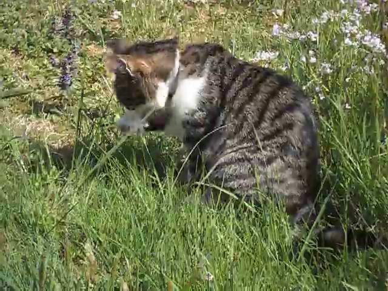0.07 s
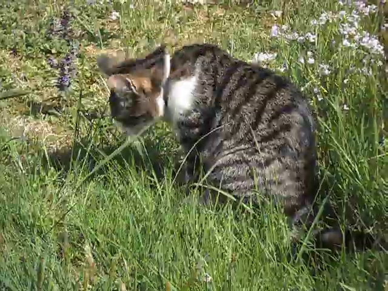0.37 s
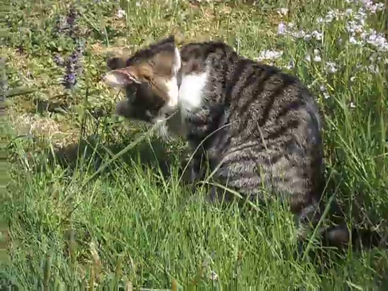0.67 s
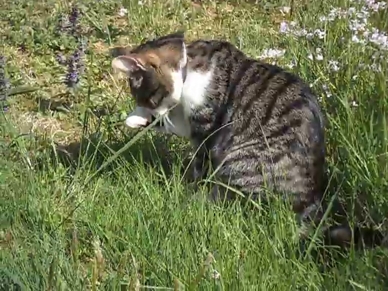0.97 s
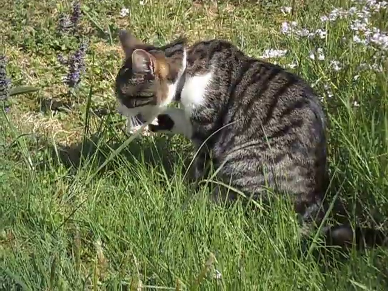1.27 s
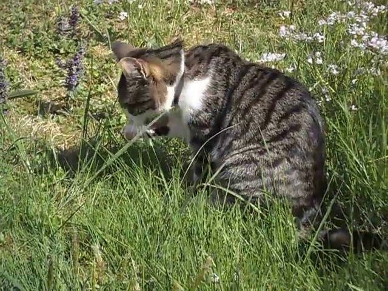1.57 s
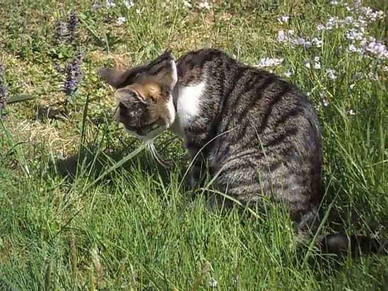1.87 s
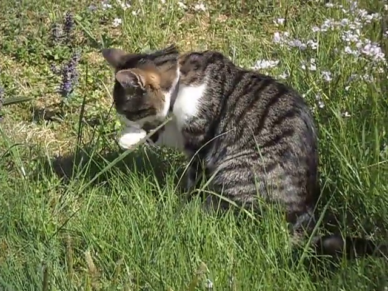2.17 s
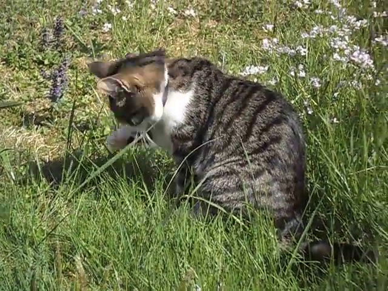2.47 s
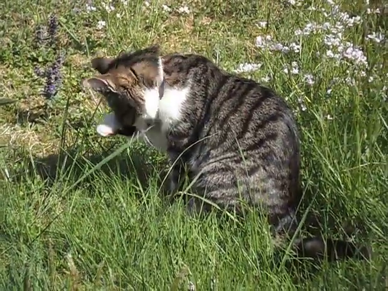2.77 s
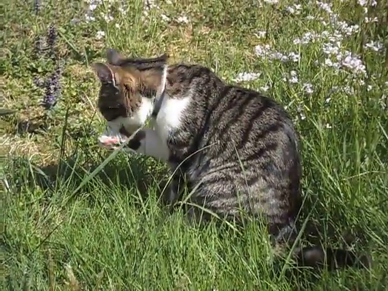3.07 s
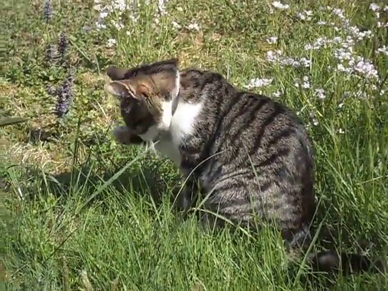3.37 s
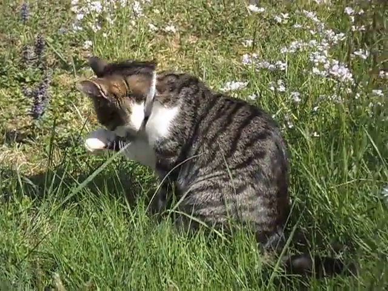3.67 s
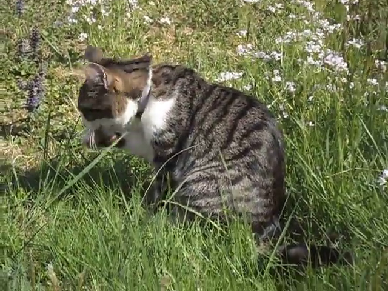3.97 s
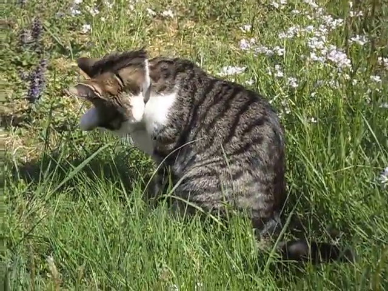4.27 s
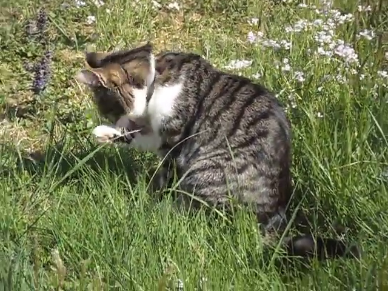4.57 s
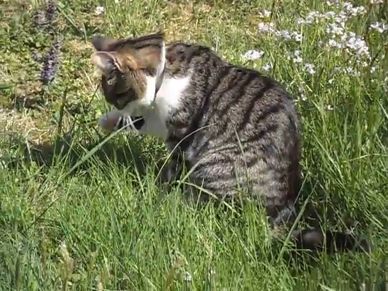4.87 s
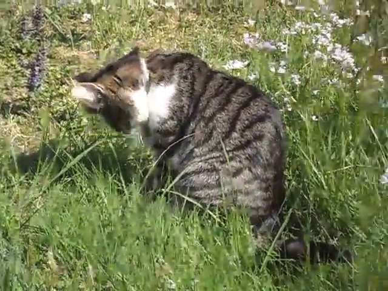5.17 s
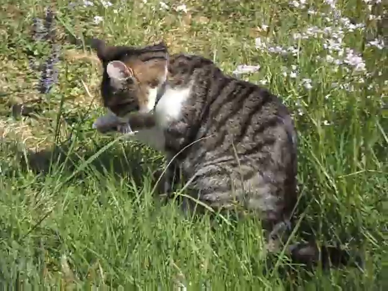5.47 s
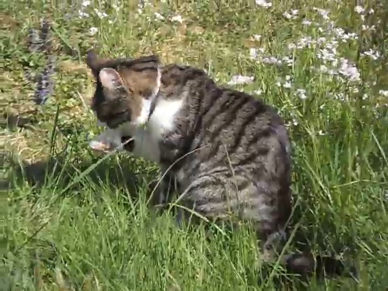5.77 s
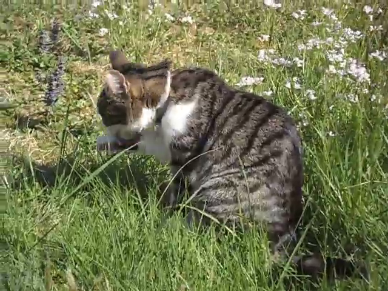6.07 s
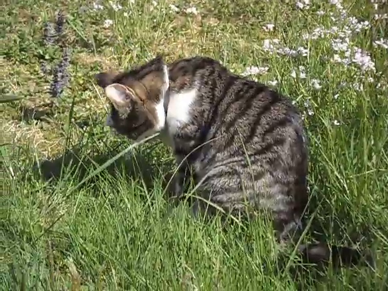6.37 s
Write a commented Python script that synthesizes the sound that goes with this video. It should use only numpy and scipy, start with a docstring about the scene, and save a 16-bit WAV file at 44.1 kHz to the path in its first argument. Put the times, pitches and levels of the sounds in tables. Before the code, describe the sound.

A low pop, then quiet outdoor hiss with soft wind rumble, a faint distant motor and a cat briefly licking its fur.

```python
"""A cat washes its paw with a few soft licks, its barbed tongue rubbing over the fur.
It sits in a quiet meadow before a small camera, whose microphone comes on with a pop
and adds steady hiss and a thin electronic whine. Eddies of a light breeze press on the
diaphragm, a far-off motor hums faintly, and one small tick rings briefly."""
import sys
import numpy as np
from scipy.fft import rfft, irfft, next_fast_len
from scipy.io import wavfile
from scipy.ndimage import map_coordinates

SR = 44100
rng = np.random.default_rng(int(sys.argv[2]) if len(sys.argv) > 2 else 0)


def transcribe(signal):
    """Save signal, clipped to [-1, 1], as a 16-bit WAV file at the path in sys.argv[1]."""
    frames = np.atleast_2d(signal).T
    limited = np.clip(frames, -1, 1)
    pcm = np.round(limited * 32767).astype(np.int16)
    wavfile.write(sys.argv[1], SR, pcm)


N = 287973
SWITCH_ON_S = 0.222


def amp(db):
    """Amplitude ratio of a level in decibels."""
    return 10 ** (np.asarray(db) / 20)


def unit(x):
    """x normalised to rms 1."""
    return x / np.sqrt(np.mean(x ** 2) + 1e-20)


def clock():
    """The time of each sample in seconds."""
    return np.arange(N) / SR


def wobble(rate):
    """Smooth random modulation: a spline through rate knots a second."""
    knots = rng.standard_normal(int(N * rate / SR) + 4)
    return map_coordinates(knots, [clock() * rate])


def coloured(x, points, top_hz=np.inf):
    """Zero-phase filtering by (f/Hz, gain/dB) points on a log axis, cut off at top_hz."""
    size = next_fast_len(N + SR // 2)
    hz = np.fft.rfftfreq(size, 1 / SR)
    f, db = np.transpose(points)
    gain = amp(np.interp(np.log(hz + 1), np.log(f), db)) * (hz < top_hz)
    return irfft(rfft(x, size) * gain, size)[:N]


def noise(points):
    """Gaussian noise of rms 1, filtered to the given spectral shape."""
    return unit(coloured(rng.standard_normal(N), points))


def tone(hz):
    """A sine of rms 1 whose phase is the integral of its frequency."""
    return np.sqrt(2) * np.sin(2 * np.pi * (np.cumsum(hz) / SR + rng.random()))


def bias_pop(step_db=-15.0, overshoot=0.46, charge_s=0.043, leak_s=0.22):
    """Step response: the bias voltage jumps, swells and leaks away through the coupling capacitor."""
    age = np.maximum(clock() - SWITCH_ON_S, 0)
    leak = (1 + overshoot) * np.exp(-age / leak_s)
    charge = overshoot * np.exp(-age / charge_s)
    return amp(step_db) * (leak - charge)


def electronics(hiss_db=-61, waver_hz=3, settle_db=3.0, settle_s=0.067):
    """Self-noise: broadband preamplifier hiss, a little louder at switch-on, and a tonal whine."""
    # hiss spectrum: f/Hz, relative density/dB
    hiss_spectrum = [(20, -8), (200, -1.5), (2000, -1.5), (4000, -2), (8000, -4.5), (10300, -5.5),
                     (11000, -19), (11600, -4.5)]
    # partials of the whine: f/Hz, rms level/dB
    whine_partials = [(3926, -86), (7853, -82), (7882, -89.5)]
    age = np.maximum(clock() - SWITCH_ON_S, 0)
    settling = np.exp(-(age / settle_s) ** 2)
    hiss = amp(hiss_db + settle_db * settling) * noise(hiss_spectrum)
    whine = sum(amp(db) * tone(hz + waver_hz * wobble(15)) for hz, db in whine_partials)
    return hiss + whine


def meadow(air_db=-61.0):
    """Ambient noise: the distant outdoors blends into a dull, stationary wash."""
    # ambient spectrum: f/Hz, relative density/dB
    air_spectrum = [(20, 7.5), (100, 1), (200, -3), (400, -6), (800, -10), (1600, -14.5), (3200, -23.5),
                    (10000, -44)]
    return amp(air_db) * noise(air_spectrum)


def breeze(calm_db=-60, flutter_db=1.6, eddies_per_s=14):
    """Turbulent pressure: eddies rumble on the microphone, and gusts add in power to the calm."""
    # gusts: crest t/s, level/dB, half-width at 1/e of the power/s
    gusts = [(1.13, -52.5, 0.14), (1.88, -52, 0.057), (2.35, -51.5, 0.15), (2.665, -52.5, .11),
             (3.18, -53.5, 0.11), (3.575, -48.5, 0.026), (3.83, -52.5, 0.16), (4.43, -52, 0.13),
             (5.84, -48, 0.11), (6.22, -50, 0.46)]
    # spectrum of the buffeting: f/Hz, relative density/dB
    buffet_spectrum = [(4, 0), (12, 4), (22, 2.5), (35, 2.5), (55, -9), (90, -21.5), (160, -36), (500, -59),
                       (2000, -110)]
    t = clock()
    gust_power = sum(amp(db) ** 2 * np.exp(-((t - s) / half_s) ** 2) for s, db, half_s in gusts)
    envelope = np.sqrt(amp(calm_db) ** 2 + gust_power)
    flutter = amp(flutter_db * wobble(eddies_per_s))
    return envelope * flutter * noise(buffet_spectrum)


def motor(start_hz=80.1, sag_hz_per_s=2.7, waver_hz=2.38, flutter_db=-0.5):
    """Propagation: only a slowing motor's fundamental carries this far, modulated by moving air."""
    # envelope of the hum: t/s, rms level/dB
    hum_levels = [(1.0, -69.5), (1.5, -62.5), (2.0, -67.5), (2.5, -67), (2.9, -70), (3.8, -70.5),
                  (4.5, -81)]
    t = clock()
    db = np.interp(t, *np.transpose(hum_levels)) + flutter_db * wobble(6.9)
    hz = start_hz - sag_hz_per_s * t + waver_hz * wobble(18)
    return amp(db) * tone(hz)


def puffs():
    """Pressure pulses: each puff pushes the diaphragm once, with a rebound on each side."""
    # puffs of air: centre t/s, peak level/dB, dominant f/Hz
    pulses = [(0.842, -44, 17), (1.175, -45, 13), (1.825, -41, 24), (3.907, -39.5, 28), (5.031, -34, 12),
              (5.85, -41, 21)]
    out = np.zeros(N)
    for s, db, hz in pulses:
        u = (np.pi * hz * (clock() - s)) ** 2
        out += amp(db) * (1 - 2 * u) * np.exp(-u)  # Ricker wavelet
    return out


def licks(grain_db=3, grains_per_s=700, rise_s=0.0019):
    """Friction noise: the tongue's barbs catch the fur and slide off in a short, grainy swish."""
    # tongue strokes: onset t/s, level/dB, T60/s
    strokes = [(2.518, -50.5, 0.085), (4.341, -63, .05), (4.984, -60, .13)]
    # spectrum of rubbed fur: f/Hz, relative density/dB
    fur_spectrum = [(500, -30), (1800, -12), (3000, 0.5), (4200, -2), (6000, 0.5), (8500, -6), (11000, -7)]
    envelope = np.zeros(N)
    for s, db, t60 in strokes:
        age = np.maximum(clock() - s, 0)
        envelope += amp(db - 60 * age / t60) * (1 - np.exp(-age / rise_s))
    swish = noise(fur_spectrum) * amp(grain_db * wobble(grains_per_s))
    return envelope * unit(swish)


def tick():
    """Free vibration: a tiny, hard knock excites two quickly damped modes."""
    # the knock: t/s, level/dB
    knocks = [(4.75, -44)]
    # its modes: f/Hz, relative level/dB, T60/s
    modes = [(1165, 0, 0.013), (2347, -15, .015)]
    out = np.zeros(N)
    for s, db in knocks:
        age = np.maximum(clock() - s, 0)
        for hz, mode_db, t60 in modes:
            out += amp(db + mode_db - 60 * age / t60) * np.sin(2 * np.pi * hz * age)
    return out


def scene():
    """Superposition: the pressures of all sources add at one microphone."""
    return (meadow() + breeze() + motor() + puffs() + licks() + tick())[None]


def record(dry):
    """Gating and band limiting: the input opens abruptly, adds its pop and noise, and cuts the treble."""
    # the camera's treble roll-off: f/Hz, gain/dB
    roll_off = [(9900, 0.5), (11000, -1.5), (11600, -16.5), (12200, -27)]
    live = (dry[0] + bias_pop() + electronics()) * (clock() >= SWITCH_ON_S)
    return coloured(live, roll_off, top_hz=12263)[None]


dry = scene()
out = record(dry)
transcribe(out)
```